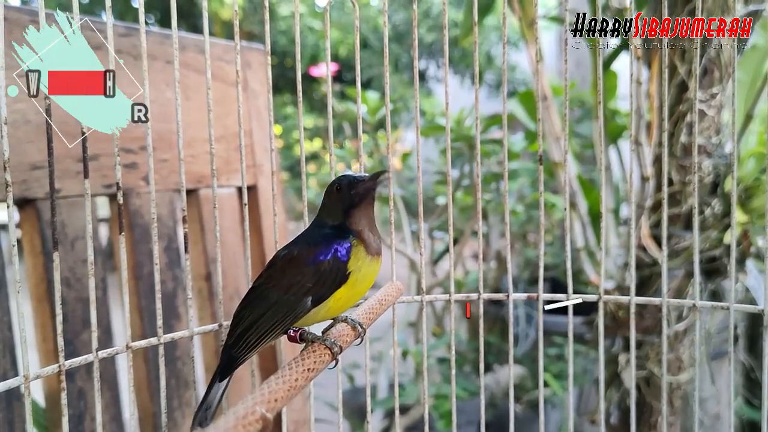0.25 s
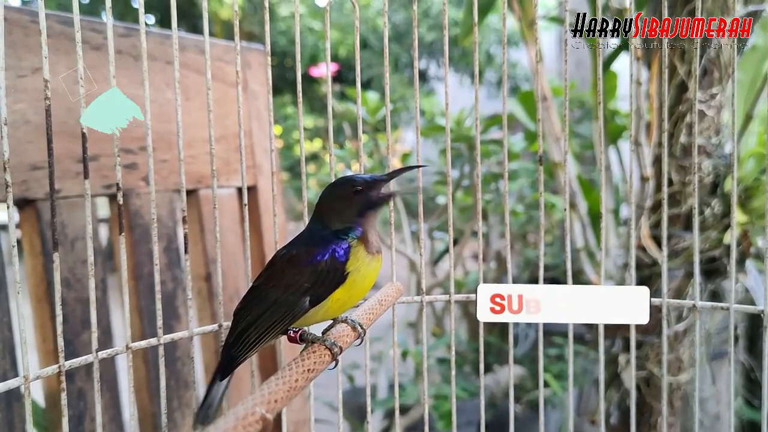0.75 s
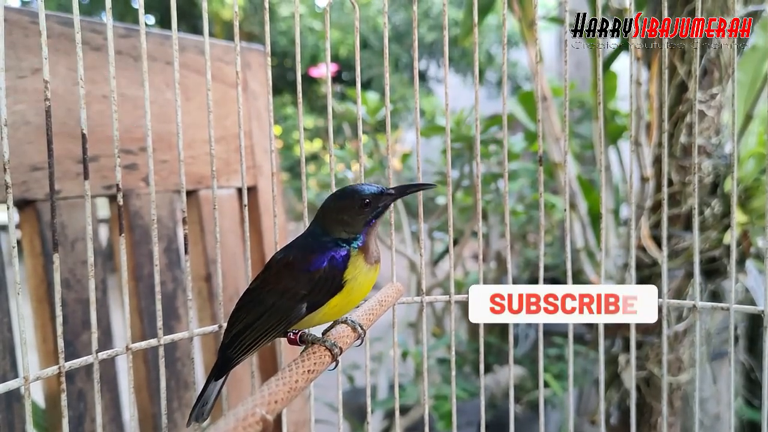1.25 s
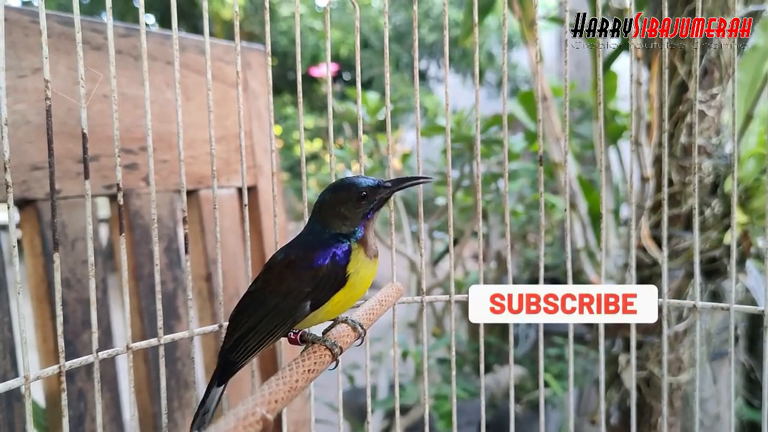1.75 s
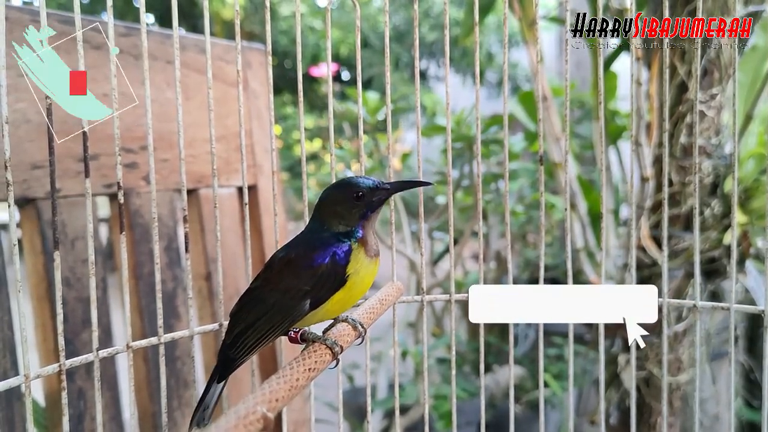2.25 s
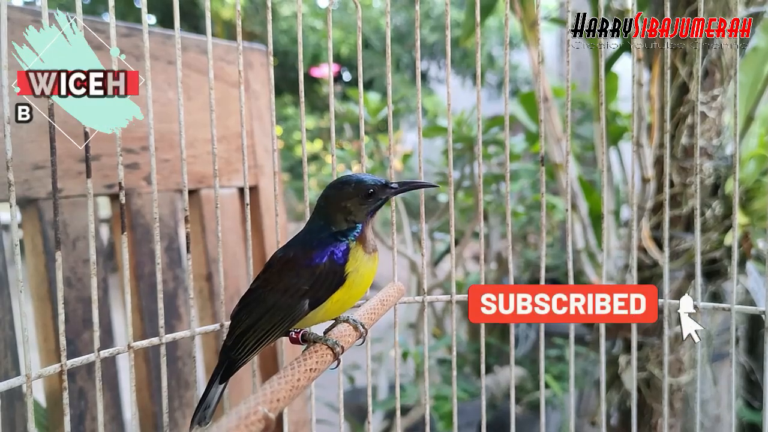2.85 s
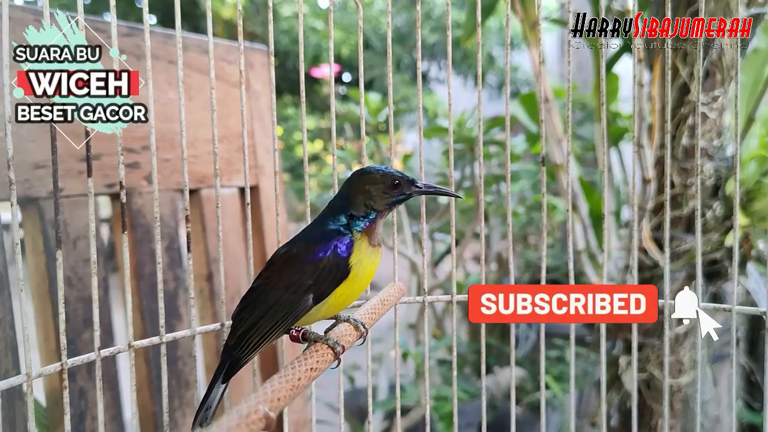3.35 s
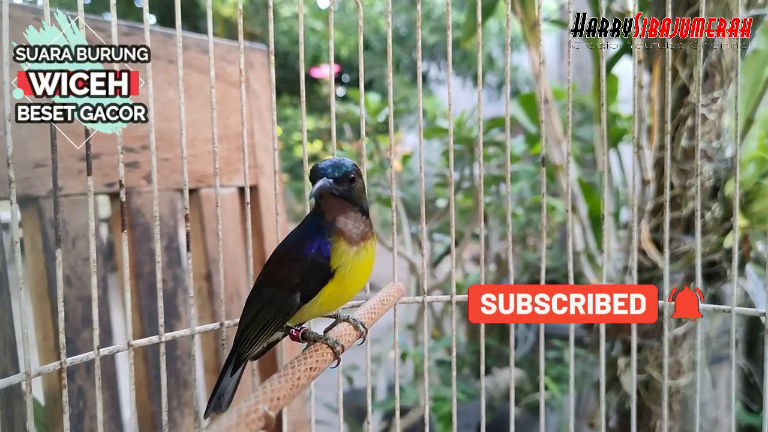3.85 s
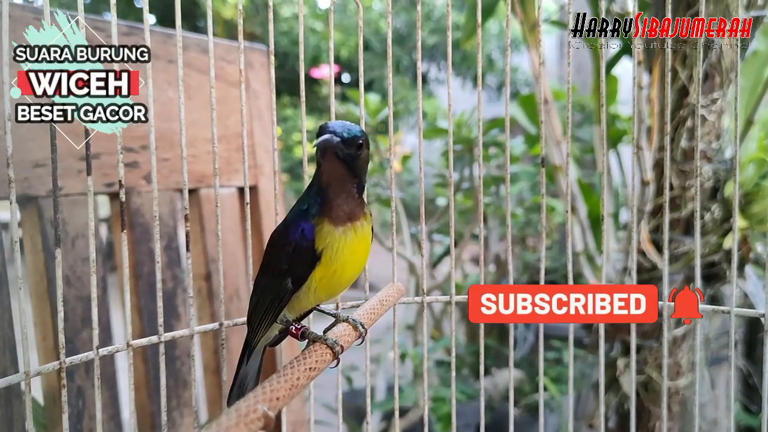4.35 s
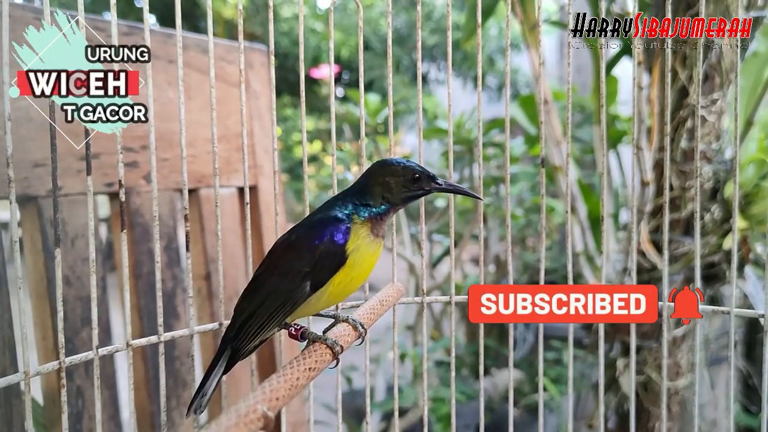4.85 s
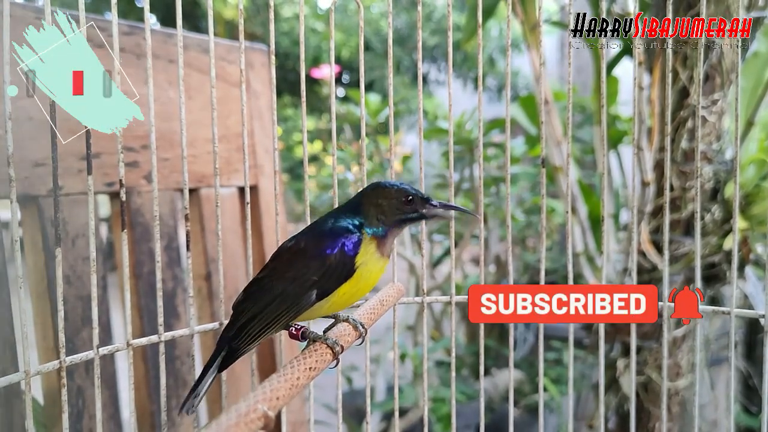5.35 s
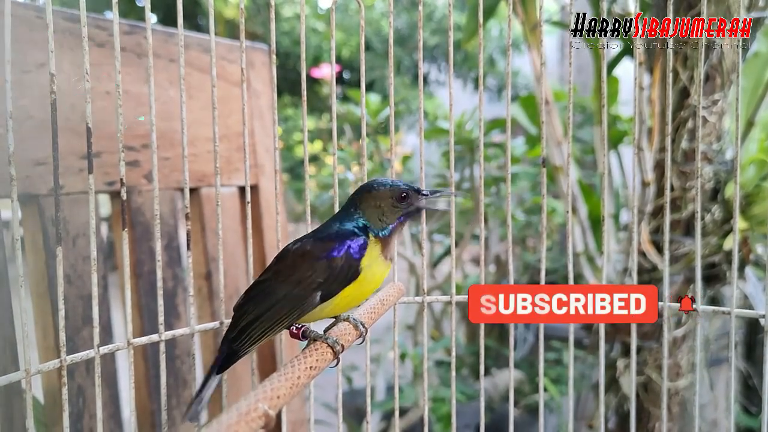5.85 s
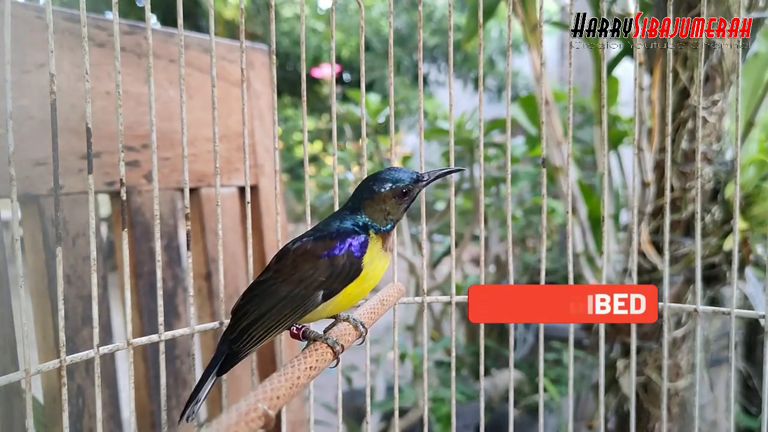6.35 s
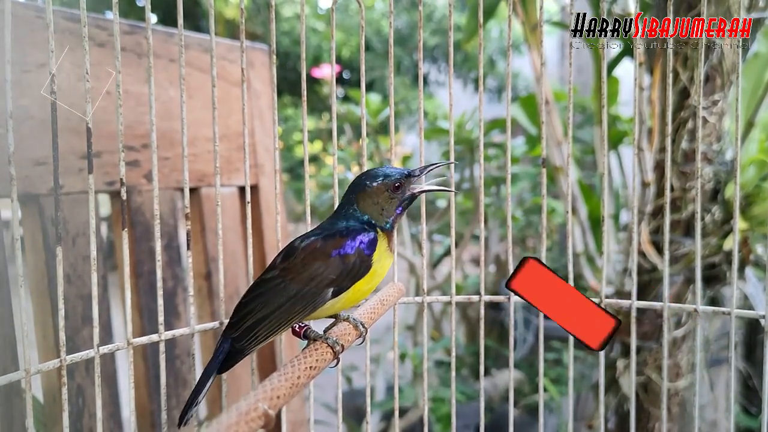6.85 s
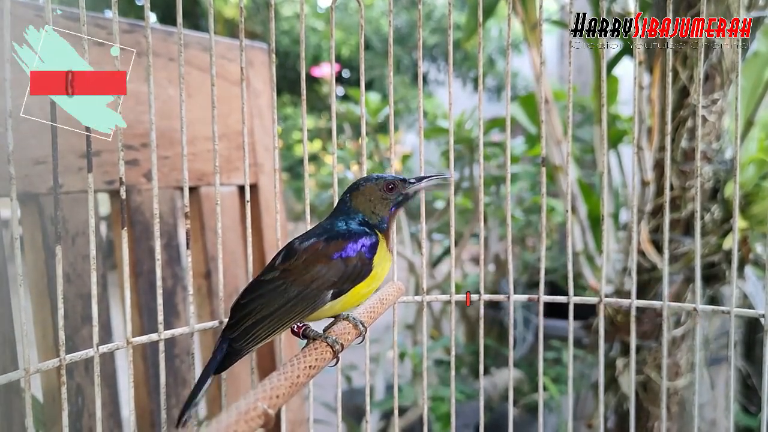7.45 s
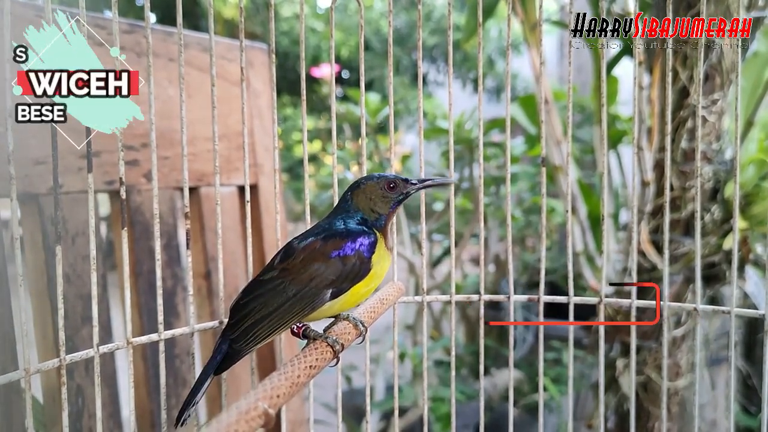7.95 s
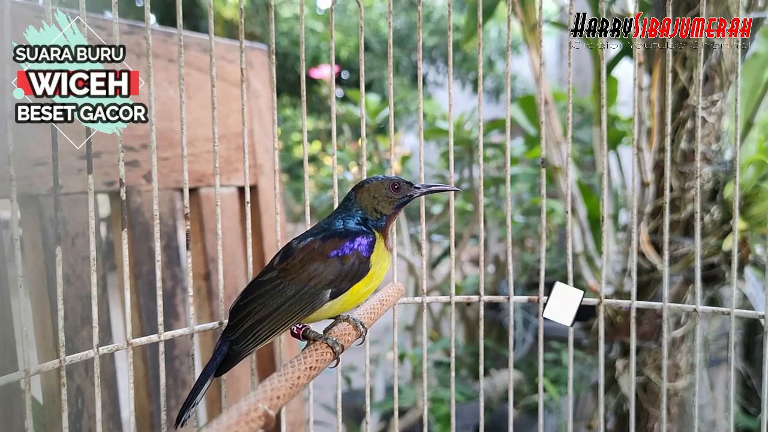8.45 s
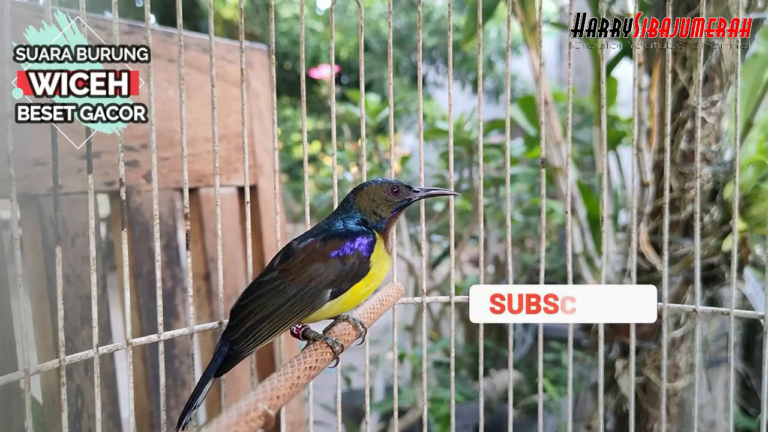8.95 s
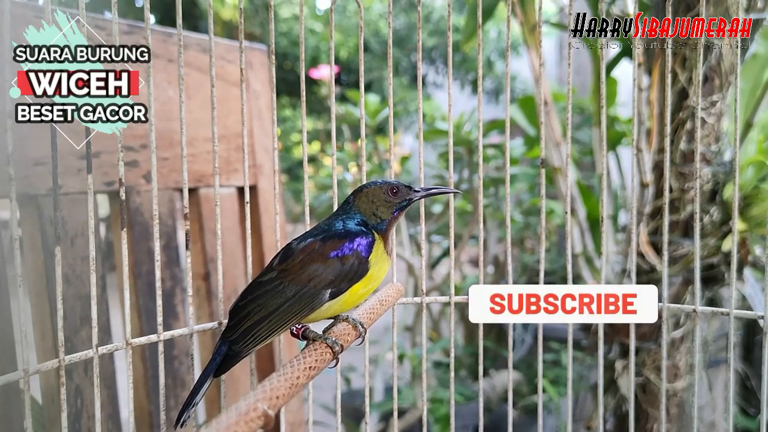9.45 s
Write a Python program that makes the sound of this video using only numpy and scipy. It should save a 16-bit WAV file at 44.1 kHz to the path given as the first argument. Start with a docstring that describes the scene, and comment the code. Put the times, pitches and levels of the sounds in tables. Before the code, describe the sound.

Bursts of high, sharp chirps from a nearby caged bird mix with a second bird's quick chatter, buzzy notes and occasional soft hollow knocks.

```python
"""A small caged bird calls close by in a walled garden: sharp rising chirps, near-sine sweeps
coloured by throat, beak and cage. A neighbouring bird chatters in short harmonic notes, whistles
and buzzes of puffed noise. Something hollow is knocked now and then and rings in two modes.
Far off, two roosters crow and small birds twitter over outdoor air. The walls add a short bright tail."""
import sys
import numpy as np
from scipy import signal
from scipy.fft import rfft, irfft, next_fast_len
from scipy.io import wavfile
from scipy.ndimage import uniform_filter1d

SR = 44100
rng = np.random.default_rng(int(sys.argv[2]) if len(sys.argv) > 2 else 0)


def digitize_waveform(pressure):
    """Quantize a signal to 16-bit integers and store it at the path in sys.argv[1].

    Rows of a 2-D input are taken as channels; values are limited to [-1, 1].
    """
    field = np.atleast_2d(pressure).T
    bounded = np.clip(field, -1, 1)
    quanta = np.round(bounded * 32767).astype(np.int16)
    wavfile.write(sys.argv[1], SR, quanta)


N = 428652

# caged bird: (mid-sweep time [s], time left [s], top pitch [Hz], effort [dB], fade [dB],
# overtone [dB], rasp [dB])
CHIRPS = [(0.4104, 0.032, 6000, -11.5, -4.5, -14.5, -12.5), (1.007, 0.027, 5930, -12.5, 1.5, -16.5, -13.5),
          (1.3562, 0.031, 5755, -11.5, -2, -14, -11.5), (1.6674, 0.041, 6214, -9.5, -5, -15, -16),
          (1.8825, 0.039, 6460, -11, 1, -17, -22), (2.089, .0392, 6360, -11.5, -5, -18.5, -17),
          (2.3532, .0424, 6330, -9.5, -6, -17.5, -14.5), (2.609, .0332, 6315, -10.5, -0.5, -15.5, -14.5),
          (5.6199, 0.027, 5730, -13.5, -12, -15.5, -11), (6.0235, 0.03, 6030, -11, -16, -16, -12),
          (7.045, .0294, 6060, -10.5, -7.5, -18, -14.5), (7.3126, 0.035, 6175, -12, -0.5, -18, -8.5),
          (7.5158, 0.037, 6400, -11, 2.5, -17, -11), (7.7025, 0.034, 6490, -11.5, 3, -16.5, -15),
          (9.0185, 0.03, 5900, -13, -11, -21, -11), (9.3736, 0.029, 5985, -12, -2.5, -16.5, -13)]
# rise shared by all chirps: (time from mid-sweep [s], pitch [Hz])
SWEEP = [(-.026, 2546), (-.018, 2826), (-.010, 3288), (-.004, 4056), (.003, 4850), (.009, 5498)]
# throat, beak and cage resonances: (centre [Hz], width [Hz], gain [dB])
TRACT = [(3356, 2270, -20.5), (4225, 190, -4.5), (4890, 490, -5), (5504, 766, 3.5), (6204, 740, 1.5),
         (7315, 430, -0.5), (8320, 480, -14), (9323, 740, -14), (10530, 980, -13), (11400, 600, -20),
         (12500, 1100, -16), (14800, 2600, -24.5)]
# neighbour: (start [s], length [s], from pitch [Hz], to pitch [Hz], level [dB], overtone boost [dB])
NOTES = [(.004, 0.011, 2080, 2230, -45.5, 3), (0.014, 0.044, 2930, 3390, -40, 10),
         (.049, 0.028, 2860, 2740, -37, 4.5), (0.075, 0.027, 6300, 6180, -41.5, 5),
         (.139, 0.021, 2040, 2300, -45, -7), (0.157, 0.017, 3220, 3470, -35.5, 5.5),
         (.172, 0.022, 2916, 2780, -34, 4), (0.189, 0.033, 5460, 6400, -44, 8),
         (.73, .013, 2100, 2300, -45.5, 5), (.742, 0.039, 2990, 3510, -29.5, 11.5),
         (0.772, 0.039, 2570, 2436, -35.5, 5.5), (0.793, 0.032, 6270, 6340, -29.5, -5),
         (0.865, 0.022, 2090, 2300, -42, -2), (0.886, 0.039, 3035, 2857, -28, 5.5),
         (0.92, 0.026, 5900, 6300, -27.5, 2), (1.383, 0.028, 3510, 3190, -28.5, 2),
         (1.412, 0.027, 2770, 2907, -30, 13), (1.438, 0.015, 6030, 6200, -35, 0),
         (1.501, .014, 2100, 2350, -48, -10), (1.514, 0.019, 3590, 3406, -30.5, -2),
         (1.53, 0.028, 2786, 2650, -36.5, 5), (1.557, 0.019, 6000, 6197, -29, -2),
         (1.997, 0.035, 2740, 3020, -33.5, 8), (2.027, 0.038, 2335, 2500, -33.5, 8.5),
         (2.058, 0.017, 6100, 6300, -25, -2), (2.131, 0.02, 2150, 2330, -47.5, -17),
         (2.148, 0.019, 3240, 3420, -30, -10), (2.163, 0.029, 2500, 2450, -37.5, 3),
         (2.184, .024, 5980, 5970, -35.5, -2), (2.649, 0.04, 2920, 3010, -34.5, 9),
         (2.691, 0.046, 2380, 2490, -40, 6.5), (2.724, 0.025, 6190, 5910, -31, -2),
         (2.785, 0.022, 1826, 2020, -48.5, -3), (2.808, 0.019, 2980, 2890, -33, -18),
         (2.821, 0.038, 2240, 2270, -37, -1), (2.848, 0.019, 5460, 5820, -30.5, 4.5),
         (3.475, 0.012, 3470, 4200, -43.5, 8), (3.486, 0.049, 2780, 2990, -30.5, 9.5),
         (3.525, 0.0393, 2596, 2510, -33.5, 7), (3.562, .03, 5950, 6300, -40, 5),
         (3.626, 0.025, 1810, 2180, -48.5, -14), (3.651, 0.018, 3200, 3285, -29, -8),
         (3.669, 0.03, 2210, 2355, -37.5, 3.5), (3.692, 0.023, 5400, 6080, -36.5, 5),
         (4.381, 0.099, 2417, 2470, -33, 12.5), (4.692, .035, 3590, 3300, -54, 12),
         (4.738, 0.04, 6350, 6180, -59, -1), (4.836, 0.027, 3495, 3260, -50, 9),
         (4.852, 0.037, 2670, 2510, -61, 4), (4.87, 0.036, 6120, 6500, -64, 1),
         (5.462, 0.032, 2400, 2340, -49.5, 4), (5.512, 0.14, 2400, 2640, -32, -1.5),
         (5.928, 0.037, 4660, 5120, -49, 2), (5.987, 0.074, 2340, 2575, -29.5, 4),
         (6.378, 0.065, 2280, 2405, -38, 2), (6.776, 0.046, 2170, 2250, -40, -6),
         (7.211, 0.052, 2220, 2220, -37, -0.5), (7.72, 0.06, 2240, 2330, -40.5, 4),
         (8.95, 0.14, 2276, 2657, -29, 5)]
# neighbour's throat: (frequency [Hz], gain [dB])
THROAT = [(2100, -13.5), (2600, -12), (2950, -6.5), (3400, 0.3), (4200, -14), (4800, -4.5), (5800, -12.5),
          (6400, -17.5), (7200, -22), (8600, -34), (10400, -35), (13600, -54.5)]
# by register: (pitch [Hz], roughness [0-1])
ROUGHNESS = [(2400, .5), (3100, 1), (5000, 0.6)]
# by register: (pitch [Hz], arch [share of pitch])
ARCH = [(2500, -.01), (3200, .05), (6000, 0.084)]
# neighbour: (start [s], length [s], low band [Hz], high band [Hz], low [dB], high [dB], swell [dB])
BUZZES = [(4.366, 0.02, 2880, 5400, -35, -28.5, 23.5), (4.482, .09, 3100, 5560, -32.5, -36, 2.5),
          (5.501, 0.014, 3040, 5200, -35, -31.5, 9), (5.643, 0.07, 2970, 5350, -34, -35.5, -1),
          (5.973, .014, 2850, 5400, -26.5, -24.5, 22), (6.057, 0.086, 2920, 5280, -36, -33, 5),
          (6.362, 0.019, 2630, 5110, -52, -38.5, 3), (6.444, .087, 3060, 5070, -39.5, -36, -3.5),
          (6.76, 0.024, 3100, 5250, -36.5, -36, 6.5), (6.815, 0.098, 2970, 4910, -35.5, -32, 3),
          (7.196, 0.021, 3320, 5520, -31.5, -32.5, 7.5), (7.252, 0.082, 2830, 5100, -34.5, -30, 9),
          (7.767, 0.1, 2660, 5200, -42, -38.5, 3), (7.826, 0.048, 3380, 5670, -33.5, -36, -1.5),
          (8.958, 0.018, 2640, 4960, -39.5, -31, 5), (9.084, .082, 2990, 5200, -35, -34, -1.5)]
# blows: (time [s], level [dB], low mode gain [dB], slap gain [dB])
KNOCKS = [(0.629, -40.5, -11, -16), (0.745, -32, -16, -23.5), (0.889, -42.5, -16, -20),
          (1.292, -44.5, -6, -13), (1.399, -44, -8, -12), (1.581, -47, -7, -7), (2.034, -33.5, -17.5, -7),
          (2.333, -42, -8, 1.5), (2.563, -39.5, -5, -9.5), (2.665, -58, 5, -16), (2.816, -40.5, -4, -16),
          (3.397, -41, -6, -8.5), (3.681, -51, 4, -8), (3.733, -36, -11.5, -11.5), (3.871, -35, -19, -9),
          (4.037, -49, -2, -9), (4.469, -52, -3, -6), (4.52, -46.5, -20.5, -7), (4.733, -51, -4.5, -11.5),
          (4.886, -45.5, -12.5, -5.5), (5.435, -58, 6, -17), (5.776, -55, 3.5, -23),
          (5.872, -36, -24, -12.5), (6.303, -52, -7, -17), (8.207, -48.5, -16, -16), (8.374, -42, -7, -15)]
# hollow body: (frequency [Hz], t60 [s])
HOLLOW_MODES = [(123, 0.3), (245, 0.14)]
# roosters: (start [s], length [s], pitch [Hz], sag [Hz/s], level [dB], fade [dB])
CROWS = [(3.55, 1.7, 835, 65, -61, -20.5), (3.5, 1.534, 1870, 170, -68, -5.5)]
# one list per crow: (pitch multiple, gain [dB])
CROW_PARTIALS = [
    [(1, 0), (2, -11), (3, -13)],
    [(1, -1), (1.5, -7)],
]
# clearest chips of far birds: (start [s], pitch [Hz], level [dB])
CHIPS = [(.325, 4950, -59.5), (.62, 5300, -63), (.672, 4300, -58), (1.102, 3730, -52), (1.238, 3790, -52),
         (1.745, 3800, -58), (2.955, 3630, -57), (3.085, 3930, -62), (3.175, 3700, -66),
         (3.285, 3700, -65.5), (3.395, 3850, -59.5), (3.785, 3800, -61), (3.97, 3650, -61),
         (4.29, 3720, -59), (4.08, 4990, -67.5), (5.09, 5100, -67), (7.63, 4900, -57)]
# outdoor air spectrum: (frequency [Hz], relative density [dB])
AIR_SPECTRUM = [(15, -74), (25, -40), (113, -5), (165, -13), (241, -6), (425, -14), (858, -15.5),
                (1070, -18), (1400, -17), (2670, -23), (2970, -23), (4340, -19.5), (5830, -32),
                (7850, -33.5), (15800, -42)]
# wall tail: (frequency [Hz], t60 [s])
WALL_DECAY = [(2000, 0.31), (4000, 0.28), (6000, 0.31), (9000, 0.19), (14000, 0.083)]

EDGE_HZ = 15900
AWAY_BELOW_DB = -48  # quieter notes are sung facing away, heard mostly off the walls


def amp(db):
    """Decibels to gain."""
    return 10 ** (np.asarray(db) / 20)


def unit_rms(x):
    """Scale to rms 1."""
    return x / np.sqrt(np.mean(x ** 2) + 1e-20)


def lookup(table, hz):
    """Interpolate over log frequency."""
    table_hz, value = np.transpose(table)
    return np.interp(np.log(hz + 1), np.log(table_hz + 1), value)


def add(mix, start_s, sound):
    """Mix in at start_s."""
    part = mix[max(round(start_s * SR), 0):][:len(sound)]
    part += sound[:len(part)]


def drift(size, span):
    """Random wander, rms 1, smoothed over span points."""
    return unit_rms(uniform_filter1d(uniform_filter1d(rng.standard_normal(size), span), span))


def resonate(x, hz, width_hz):
    """Band-pass: shift hz to zero, smooth twice, shift back."""
    carrier = np.exp(2j * np.pi * np.cumsum(hz * np.ones(len(x))) / SR)
    pole = np.exp(-np.pi * width_hz / SR)
    return 2 * (carrier * signal.lfilter([(1 - pole) ** 2], [1, -2 * pole, pole ** 2], x / carrier)).real


def tones(hz, partials):
    """Sines (multiple, gain [dB]) on a pitch curve, muted above EDGE_HZ."""
    phase = 2 * np.pi * np.cumsum(hz) / SR
    return np.sqrt(2) * sum(amp(db) * (k * hz < EDGE_HZ) * np.sin(k * phase) for k, db in partials)


def chirp(middle_s, left_s, top_hz, effort_db, fade_db, overtone_db, rasp_db):
    """Rising near-sine, raspy until the membranes settle. Returns (start [s], sound)."""
    sweep_s, sweep_hz = np.transpose(SWEEP)
    t = np.arange(sweep_s[0] - .014, left_s + .0014, 1 / SR)
    top_share, sag_hz = .86, 159.3  # after the sweep: arch to the top, then sag
    arch = np.maximum((t - sweep_s[-1]) / (top_share * (left_s - sweep_s[-1])), 0)
    hz = np.interp(t, sweep_s, sweep_hz)
    hz += (top_hz - sweep_hz[-1]) * np.sin(np.pi / 2 * np.minimum(arch, 1))
    hz -= sag_hz * np.clip(arch - 1, 0, 1) * top_share / (1 - top_share)
    unsettled = np.exp(-np.maximum(t - sweep_s[1], 0) / .038)
    hz = uniform_filter1d(hz, 120) * (1 + (.0024 + .037 * unsettled) * drift(len(t), 24))
    level_db = effort_db + np.interp(t, [sweep_s[-1], left_s], [0, fade_db]) + 1.2 * drift(len(t), 50)
    entry_db = 900.5 * np.minimum(t - sweep_s[2], 0)  # fundamental enters after its overtone
    thinning_db = -600 * np.maximum(t - sweep_s[4], 0)
    clear = tones(hz, [(1, level_db + entry_db), (2, overtone_db + np.maximum(thinning_db, -14)),
                       (3, overtone_db - 12.5 + thinning_db)])
    clear *= np.clip((t - sweep_s[0] + .0027) / .021, 0, 1)
    grain_db = np.minimum(7.3 * drift(len(t), 30), 8)
    rasp = amp(rasp_db + grain_db) * rng.standard_normal(len(t))
    rasp *= np.clip((t - t[0]) / .026, 0, 1) ** 2.5 / (1 + np.exp((t - sweep_s[2]) / .015))
    release = np.clip((t[-1] - t) / .0046, 0, 1)
    return middle_s + t[0], (clear + rasp) * release


def tract(x, notch_hz=5860, notch_width_hz=200, sideband_hz=3890, sideband_db=-35.5):
    """Throat, beak and cage resonate; the cage cancels one band. Faint copies sound above and below."""
    hz = np.fft.rfftfreq(N, 1 / SR)
    power = sum(amp(db) ** 2 / (1 + (2 * (hz - centre_hz) / width_hz) ** 2) ** 2
                for centre_hz, width_hz, db in TRACT)
    notch = 1 - .75 / (1 + (2 * (hz - notch_hz) / notch_width_hz) ** 2)
    coloured = irfft(rfft(x) * np.sqrt(power) * notch, N)
    return coloured * (1 + 2 * amp(sideband_db) * np.sin(2 * np.pi * sideband_hz * np.arange(N) / SR))


def note(length_s, from_hz, to_hz, level_db, boost_db, settle_s=.035):
    """Neighbour's harmonic note: scoops up, arches, steadies as it is held."""
    t = np.arange(0, length_s, 1 / SR)
    rough = lookup(ROUGHNESS, from_hz) * np.exp(-t / settle_s)
    arch = lookup(ARCH, from_hz) * (np.sin(np.pi * t / length_s) - .6)
    scoop = .08 * np.exp(-t / .004)
    hz = (from_hz + (to_hz - from_hz) * np.sin(np.pi / 2 * t / length_s)) * (1 + arch - scoop)
    hz *= 1 + .022 * rough * drift(len(t), 30) + .007 * drift(len(t), 350)  # jitter, slow waver
    partials = [(k, lookup(THROAT, k * hz) + boost_db * (k > 1)) for k in range(1, 6)]
    flutter_db = 5.1 * rough * drift(len(t), 50) + 2.7 * drift(len(t), 300)
    clear = amp(level_db + flutter_db) * unit_rms(tones(hz, partials))
    breath = amp(-18.5) * rough * clear * drift(len(t), 12)
    return (clear + breath) * np.clip(np.minimum(t, length_s - t) / .003, 0, 1) ** .65


def buzz(length_s, low_hz, high_hz, low_db, high_db, swell_db, puffs_per_s=240, rise_per_s=1.7):
    """Neighbour's buzz: uneven noise puffs ring two climbing bands and two faint steady ones."""
    t = np.arange(0, length_s, 1 / SR)
    cycles = np.cumsum(puffs_per_s * (1 + .37 * drift(len(t), 150))) / SR
    pulses = uniform_filter1d(np.exp(-(cycles % 1) / .35), 40)
    puffs = (.3 + pulses) * rng.standard_normal(len(t))

    def band(hz, width_hz):
        return unit_rms(resonate(resonate(puffs, hz, width_hz), hz, width_hz))

    rise = 1 + rise_per_s * t
    low = amp(low_db) * band(low_hz * rise, 950)
    high = amp(high_db) * (band(high_hz * rise, 2100) + .25 * band(7680, 1200))
    top = amp(high_db - 24) * band(10300, 2900)
    swell = amp(swell_db * (t / length_s - 1))
    attack = np.clip(t / .0011, 0, 1)
    release = np.clip((length_s - t) / min(.011, length_s / 4), 0, 1)
    return (low + high + top) * swell * attack * release


def knocks(slap_t60_s=.068, attack_s=.0045):
    """Each blow slaps dully and rings the hollow body's two modes."""
    out, t = np.zeros(N), np.arange(SR // 2) / SR
    (low_hz, low_t60_s), (high_hz, high_t60_s) = HOLLOW_MODES
    for start_s, level_db, low_db, slap_db in KNOCKS:
        detune = 1 + .03 * rng.standard_normal(2)
        low = amp(low_db - 60 * t / low_t60_s) * np.sin(2 * np.pi * low_hz * detune[0] * t)
        high = amp(-2 - 60 * t / high_t60_s) * np.sin(2 * np.pi * high_hz * detune[1] * t)
        noise = unit_rms(resonate(rng.standard_normal(len(t)), hz=600, width_hz=500))
        slap = amp(slap_db - 60 * t / slap_t60_s) * noise
        add(out, start_s, amp(level_db) * (low + high + slap) * np.clip(t / attack_s, 0, 1))
    return out


def roosters():
    """Two long sinking crows, wavering with distance."""
    out = np.zeros(N)
    for (start_s, length_s, hz, sag_hz_per_s, level_db, fade_db), partials in zip(CROWS, CROW_PARTIALS):
        t = np.arange(0, length_s, 1 / SR)
        waver_db = 2.5 * drift(len(t), 1500)
        envelope = amp(level_db + fade_db * t / length_s + waver_db) * signal.windows.tukey(len(t), .3)
        pitch_hz = (hz - sag_hz_per_s * t) * (1 + .0049 * drift(len(t), 600))
        add(out, start_s, envelope * tones(pitch_hz, partials))
    return out


def twitter(chip_s=.045, fall_per_s=3.2, faint_per_s=8, faint_hz=(3700, 5400), faint_db=-64.5):
    """Blurred falling chips of far birds: the listed ones, plus faint ones at random."""
    out, t = np.zeros(N), np.arange(0, chip_s, 1 / SR)
    when, pitch, softness = rng.random((round(faint_per_s * N / SR), 3)).T
    faint = zip(when * N / SR, np.interp(pitch ** 2, [0, 1], faint_hz), faint_db - 10 * softness)
    for start_s, hz, level_db in CHIPS + list(faint):
        tone = tones(hz * (1 - fall_per_s * t), [(1, level_db)])
        blur = 1 + .5 * drift(len(t), 60)
        add(out, start_s, tone * blur * np.hanning(len(t)))
    return out


def air(rms_db=-61):
    """Outdoor noise with drifting spectral patches."""
    frames, hz = N // 256 + 5, np.fft.rfftfreq(1024, 1 / SR)
    real, imag, patches = rng.standard_normal((frames, 513, 3)).T
    patches_db = 2 * unit_rms(uniform_filter1d(uniform_filter1d(patches, 10, axis=0), 20, axis=1))
    shape_db = lookup(AIR_SPECTRUM, hz)[:, None] + patches_db + .9 * drift(frames, 60)
    noise = signal.istft((real + 1j * imag) * amp(shape_db), nperseg=1024, noverlap=768)[1]
    return amp(rms_db) * unit_rms(noise[:N])


def walls(x):
    """Reflections: sparse taps of random sign, each band decaying at its own rate."""
    taps = np.zeros(SR)
    slots = np.arange(200, SR - 20, 20)
    taps[slots + rng.integers(0, 20, len(slots))] = rng.choice([-1., 1.], len(slots))
    hz, t, spectra = signal.stft(taps, SR, nperseg=256)
    decay = amp(-60 * t / lookup(WALL_DECAY, hz)[:, None])
    tail = signal.istft(spectra * decay, SR, nperseg=256)[1]
    return signal.fftconvolve(x, tail / np.linalg.norm(tail))[:N]


def scene():
    """Mono mix: birds with wall tail; knocks and air dry."""
    caged, neighbour, away = np.zeros((3, N))
    for row in CHIRPS:
        add(caged, *chirp(*row))
    caged = tract(caged)
    for start_s, length_s, from_hz, to_hz, level_db, boost_db in NOTES:
        bus = away if level_db < AWAY_BELOW_DB else neighbour
        add(bus, start_s, note(length_s, from_hz, to_hz, level_db, boost_db))
    for start_s, *settings in BUZZES:
        add(neighbour, start_s, buzz(*settings))
    chips, crows = twitter(), roosters()
    direct = caged + neighbour + amp(-8) * away + chips + crows
    wet = walls(amp(-22.5) * caged)
    wet += walls(amp(-17.5) * neighbour + amp(-4.5) * away + amp(-6.5) * chips + crows)
    return (direct + wet + knocks() + air())[None]


def record(dry):
    """Soft envelope limiter, then low-pass at EDGE_HZ."""
    ceiling = .8
    drive = abs(signal.hilbert(dry, next_fast_len(N))[:, :N]) / ceiling + 1e-9
    limited = dry * uniform_filter1d(np.tanh(drive) / drive, 20)
    lowpass = signal.firwin(511, EDGE_HZ, window=("kaiser", 9), fs=SR)
    return signal.oaconvolve(limited, lowpass[None], "same")


dry = scene()
out = record(dry)
digitize_waveform(out)
```